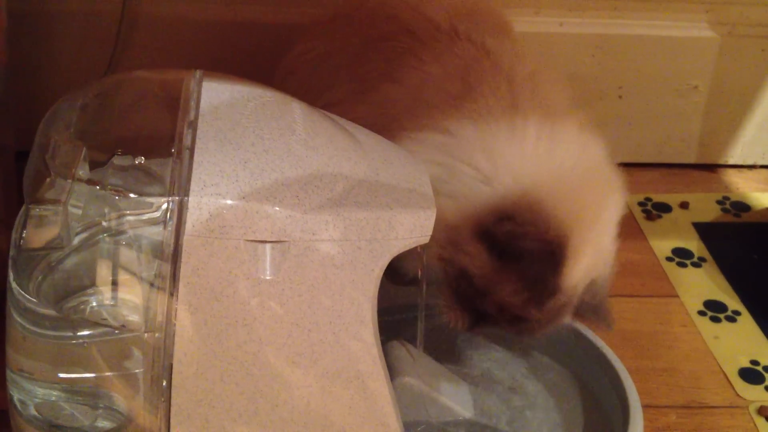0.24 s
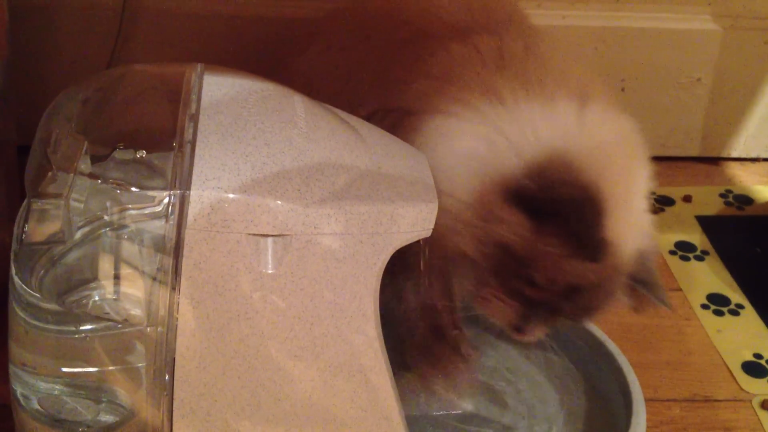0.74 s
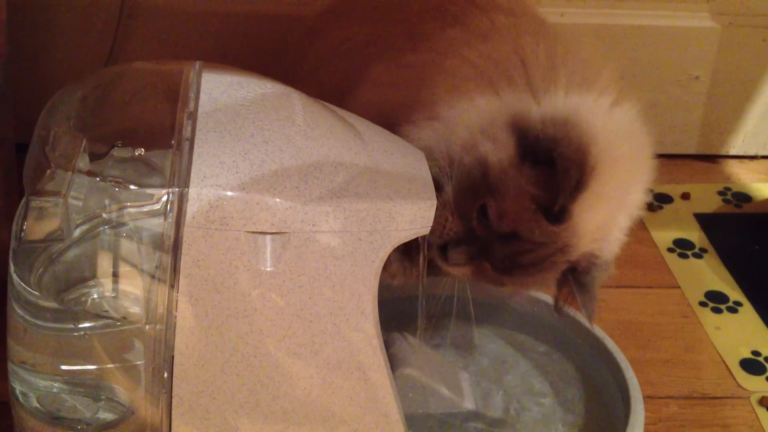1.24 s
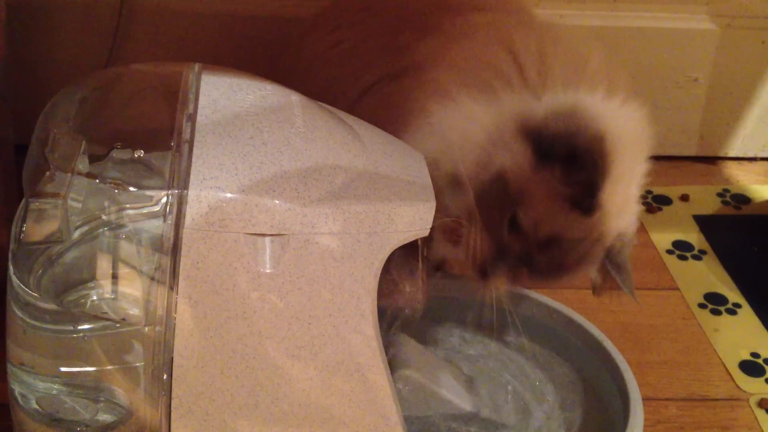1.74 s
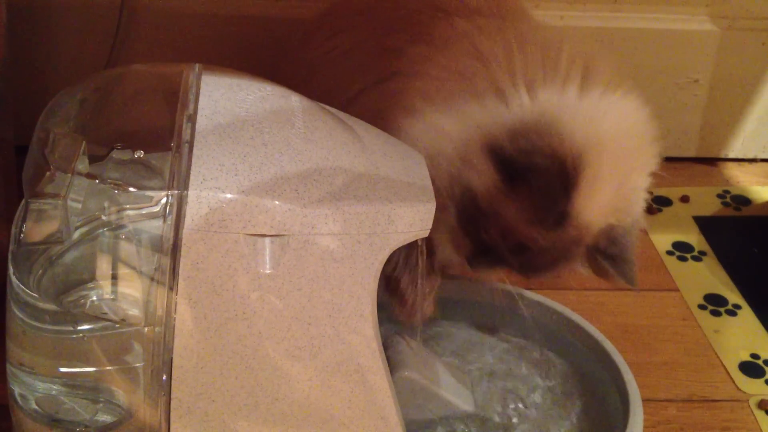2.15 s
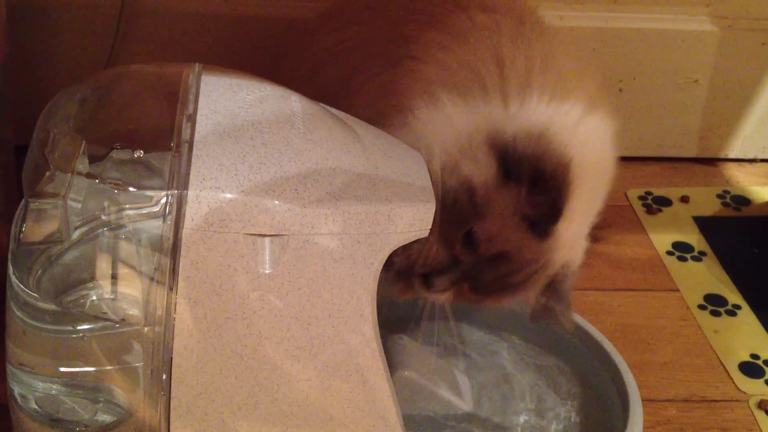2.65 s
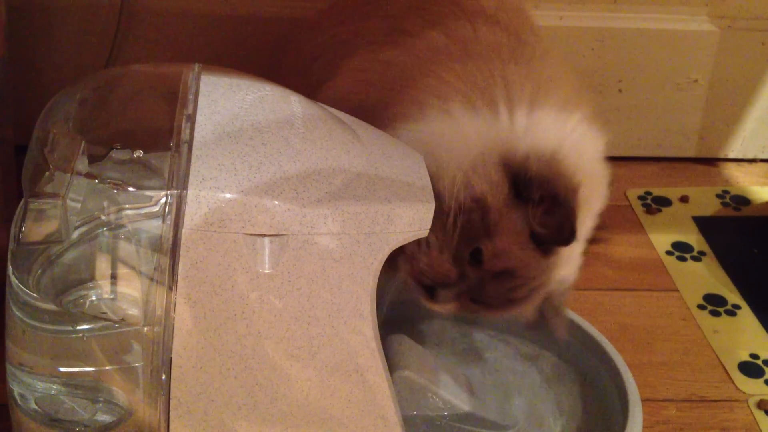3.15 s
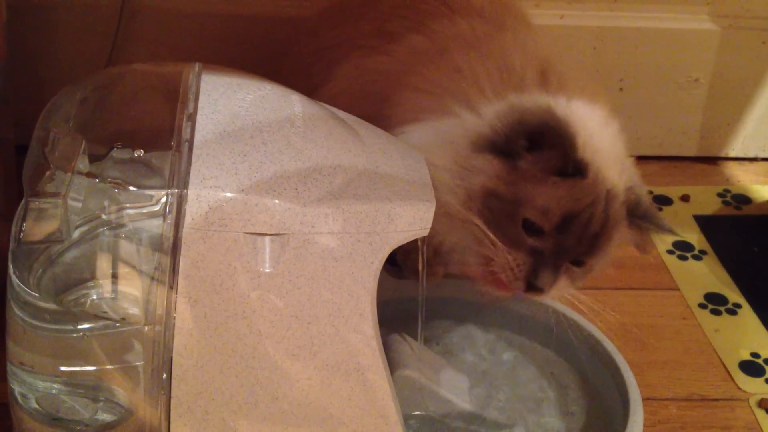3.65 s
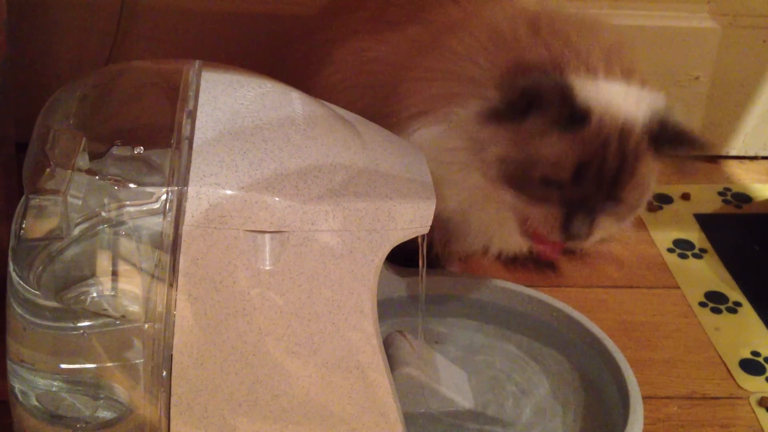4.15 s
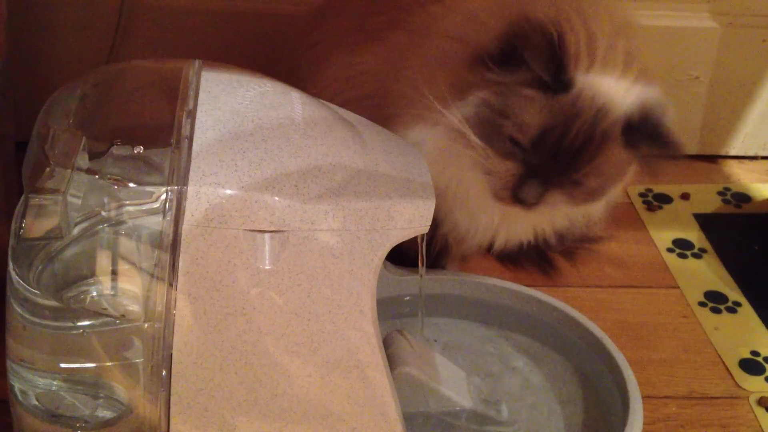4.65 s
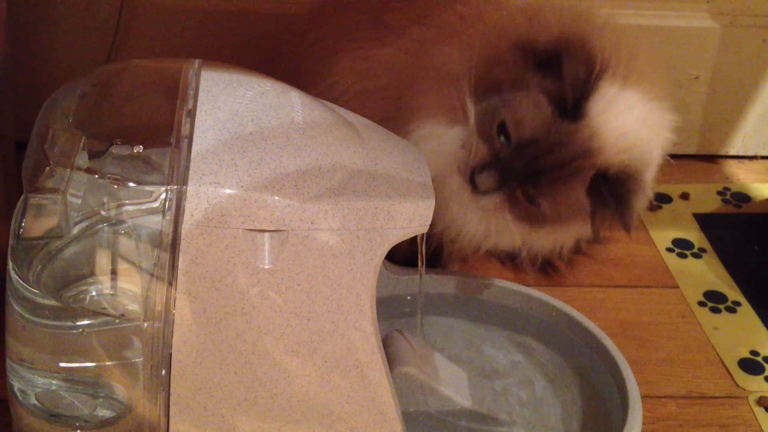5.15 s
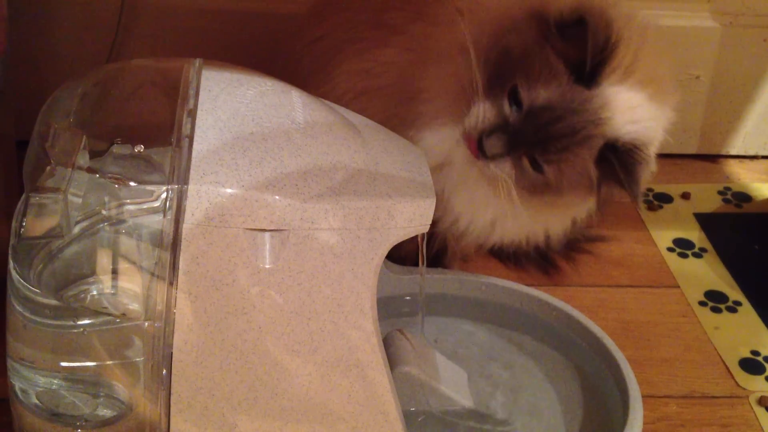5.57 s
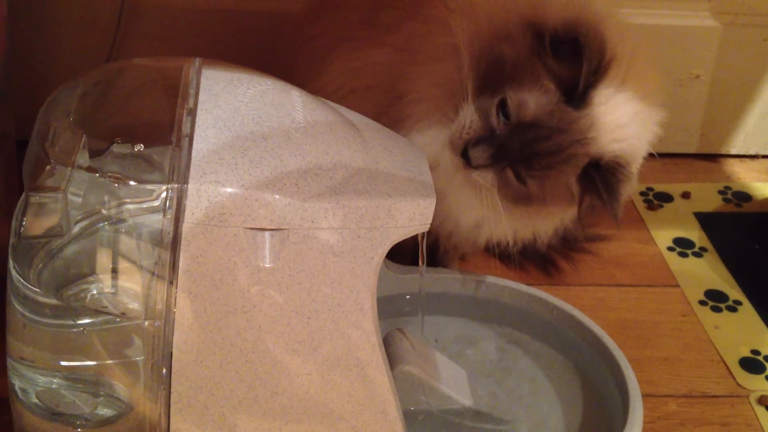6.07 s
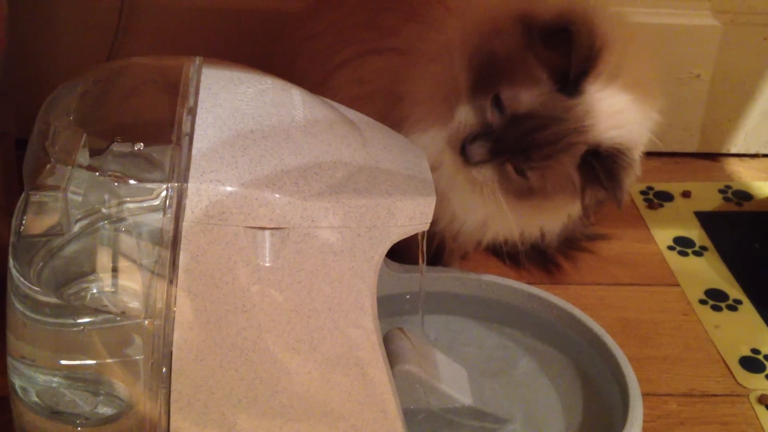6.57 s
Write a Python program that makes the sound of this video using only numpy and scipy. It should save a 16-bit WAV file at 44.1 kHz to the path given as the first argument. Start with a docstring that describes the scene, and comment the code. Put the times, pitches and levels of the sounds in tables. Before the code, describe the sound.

Small wet licks and drips over faint running water and a pump hum, with a short bubbling glug from a plastic tank midway.

```python
"""A plastic drinking fountain gulps air: bubbles ring its tank and thump the water column.
The gulps crowd together midway, where the surface churns and spits. Drops snap and trap
tiny ringing bubbles; a cat licks at the thin stream with small wet smacks.
Underneath, in a small room, the pump hums and the water runs with a soft rush and fizz."""
import sys
import numpy as np
from scipy import signal
from scipy.fft import rfft, irfft, next_fast_len
from scipy.io import wavfile
from scipy.ndimage import map_coordinates

SR = 44100
rng = np.random.default_rng(int(sys.argv[2]) if len(sys.argv) > 2 else 0)


def materialize(psi):
    """Save the field psi as 16-bit PCM at rate SR to the path in sys.argv[1].

    A 1-D psi becomes a single channel; in a 2-D psi each row is a channel.
    """
    bounded = np.clip(np.atleast_2d(psi).T, -1, 1)
    quanta = np.round(bounded * 32767).astype(np.int16)
    wavfile.write(sys.argv[1], SR, quanta)


N = 299880

# Water-filled tank: (frequency [Hz], width [Hz], gain [dB])
TANK_MODES = [(573, 21, -9), (685, 25, -5), (769, 99, -3.5), (799, 11, -4), (890, 37, -3.5),
              (1086, 41, -0.5), (1224, 49, 1.5), (1320, 47, -4.5), (1420, 81, 0.5), (1660, 34, -1)]
# Water column and base: (frequency [Hz], width [Hz], gain [dB])
COLUMN_MODES = [(240, 24, -2), (283, 19, -8), (371, 19, 2), (415, 38, 3.5), (494, 30, -2), (578, 20, 13)]
# Air entering the tank: (time [s], level [dB], pitch [Hz], thump gain [dB], trail's 20 dB fall [s])
GULPS = [(0.001, -44.5, 970, -12, .018), (1.089, -53, 836, -6, .012), (1.254, -45.5, 960, -15, .014),
         (1.903, -50, 1100, -3, .025), (2.5605, -42, 1000, -3, .018), (2.629, -44, 885, -10, 0.04),
         (2.840, -49.5, 860, 2.5, .012), (2.889, -30.5, 640, 1, .018), (2.920, -30, 790, -1.5, .06),
         (2.969, -28.5, 790, -8, .008), (2.978, -25, 1000, -6, .014), (3.014, -38.5, 740, -1, 0.1),
         (3.075, -33, 939, -8, .045), (3.117, -43, 1300, -17, .02), (3.1933, -22, 815, -9, .026),
         (3.212, -23.5, 900, -10, .055), (3.3444, -18, 870, -18, .016), (6.28, -55.5, 860, 0, .015)]
def gulps():
    """Each gulp thumps the water column; a small bubble, a big one and a fading trail ring the tank."""
    lead_s, lead_db, lead_ratio = .006, -7.5, 1.15
    trail_gap_s, trail_jitter_s, trail_ratio = .0086, .0014, 1.13
    out, t = np.zeros(N), np.arange(SR // 4) / SR
    push = bubble(t, hz=370, t60_s=.013, attack_s=.0015, rise=.03)
    thump = crest(filtered(push, lambda f: amp(-21) + resonances(COLUMN_MODES, f)))
    for start_s, db, hz, thump_db, fade_s in GULPS:
        bubbles = [(0, lead_db, hz * lead_ratio), (lead_s, 0, hz)]
        for k, (jitter, detune) in enumerate(rng.standard_normal((6, 2)), 1):
            age_s = abs(k * trail_gap_s + trail_jitter_s * jitter)
            trail_hz = hz * trail_ratio * np.exp(.16 * detune)
            bubbles.append((lead_s + age_s, -20 * age_s / fade_s, trail_hz))
        air = np.zeros(len(t))
        for delay_s, bubble_db, bubble_hz in bubbles:
            ring = bubble(t[:SR // 20], bubble_hz, t60_s=.016, attack_s=.002, rise=.035)
            add(air, delay_s, amp(bubble_db) * ring)
        slosh = 1 + .012 * rng.standard_normal()  # moving water detunes the tank
        tank = crest(filtered(air, lambda f: amp(-10) + resonances(TANK_MODES, f * slosh)))
        gulp = amp(db - 2.2) * (tank + amp(thump_db - 4.5) * thump)
        add(out, start_s, echoed(gulp, near_db=-8, near_t60_s=.04, room_db=-15))
    return out


# Spells of churning: (start [s], length [s], level [dB])
CHURN_SPELLS = [(2.943, 0.16, -56.5), (3.219, 0.041, -55), (3.356, 0.029, -63)]
def churn_db(t):
    """Surface churn level: each spell swells, holds and settles."""
    rise_db_per_s, fall_db_per_s = 500, 170
    spells_db = [db - rise_db_per_s * np.maximum(start_s - t, 0)
                 - fall_db_per_s * np.maximum(t - start_s - length_s, 0)
                 for start_s, length_s, db in CHURN_SPELLS]
    return np.max(spells_db, axis=0)


# Spray colour: (frequency [Hz], gain [dB])
SPRAY_SPECTRUM = [(900, -6), (1700, 4), (2600, -6.5), (3600, -5.5), (4800, -22), (7500, -18), (10000, -25),
                  (14000, -20)]
def spatter(bubbles_per_s):
    """The churned surface spits a spray of tiny bursts and ringing bubbles."""
    bursts_per_s, ring_cycles = 5000, 26
    bursts = rng.standard_normal(N) * (rng.random(N) < bursts_per_s / SR)
    spits = bursts * amp(3 * wobble(160))
    spray = unit(filtered(spits, lambda f: amp(along(SPRAY_SPECTRUM, f))))
    spray *= amp(churn_db(np.arange(N) / SR))
    rings, t = np.zeros(N), np.arange(SR // 50) / SR
    when, size, pitch = rng.random((bubbles_per_s * N // SR, 3)).T
    starts_s = when * N / SR
    for start_s, db, hz in zip(starts_s, churn_db(starts_s) + 1 + 7 * size, 2100 * 3.2 ** pitch):
        if db > -80:
            ring = bubble(t, hz, t60_s=ring_cycles / hz, attack_s=.0002, rise=.15)
            add(rings, start_s, amp(db) * ring)
    return spray + echoed(rings, near_db=-2, near_t60_s=.042, room_db=-14)


# Falling drops: (time [s], level [dB], pitch [Hz], ring t60 [s], snap gain [dB])
DROPS = [(1.109, -55, 2870, .008, -2), (1.259, -45.5, 4800, 0.0026, -12.5), (1.422, -56.5, 3200, .011, -8),
         (1.544, -54, 3200, 0.016, -3), (1.770, -53.5, 2630, .012, 2), (1.9054, -30.5, 2850, .018, -14),
         (2.064, -32, 5380, .01, -18), (2.15, -46.5, 7900, .01, 0), (2.482, -54, 2450, .014, -5),
         (2.601, -46, 6130, 0.0056, -1.5), (2.619, -48, 4170, 0.013, -4), (2.8399, -34.5, 2970, 0.0075, -8),
         (2.920, -36.5, 4430, 0.014, -3), (2.975, -39, 2150, 0.02, -7), (3.0153, -35.5, 2330, .012, -8),
         (3.039, -42, 3260, .016, -12), (3.05, -42.5, 4170, 0.0077, -7), (3.078, -44, 2370, .014, 2),
         (3.089, -45, 3440, .013, 1), (3.192, -46, 3060, .011, -2), (3.2268, -40, 6440, .006, -8),
         (3.264, -31.5, 3210, .009, -13), (3.345, -34.5, 2700, 0.0035, -11), (3.73, -49.5, 7830, .007, -4),
         (3.9005, -40.5, 2400, .008, -6), (5.097, -56, 3200, .019, -5), (6.539, -55, 3150, .013, -3)]
def drops():
    """A drop snaps and traps a ringing bubble; the smaller it is, the brighter the snap."""
    out, t = np.zeros(N), np.arange(SR // 4) / SR
    for start_s, db, hz, t60_s, snap_db in DROPS:
        ring = crest(bubble(t, hz, t60_s, attack_s=.0003, rise=.06))
        plink = ring + amp(snap_db) * snap(t, centre_hz=1.26 * hz)
        add(out, start_s, amp(db - .5) * echoed(plink, near_db=-2, near_t60_s=.043, room_db=-9))
    return out


# Tongue and water-film smacks: (time [s], level [dB], centre [Hz])
SMACKS = [(0.711, -52.5, 4940), (0.896, -55.5, 13500), (1.077, -57, 14500), (1.2595, -47, 4400),
          (1.9067, -38.5, 7200), (2.443, -53.5, 14000), (2.558, -47.5, 3600), (2.921, -35, 8000),
          (3.035, -38, 10500), (3.113, -46.5, 7600), (3.257, -37, 13400), (3.3457, -43.5, 7600),
          (4.749, -56, 8500), (4.960, -53.5, 4600), (5.638, -55, 6000), (5.762, -55, 7500),
          (6.1023, -43.5, 7100), (6.274, -55, 3400), (6.539, -51.5, 7000)]
def licks(faint_count):
    """The tongue and bursting water film smack, with fainter smacks scattered between."""
    out, t = np.zeros(N), np.arange(SR // 4) / SR
    faint = [(when * N / SR, -62 + 4 * size, 2800 * 5 ** pitch)
             for when, size, pitch in rng.random((faint_count, 3))]
    for start_s, db, hz in SMACKS + faint:
        add(out, start_s, amp(db) * echoed(snap(t, hz), near_db=-2.5, near_t60_s=.039, room_db=-8))
    return out


# Bursting film colour: (frequency [Hz], gain [dB])
SNAP_SPECTRUM = [(800, -3), (2500, 17), (5000, 2.5), (7500, 8.5), (10000, 0), (13500, 4.5), (16000, 8)]
def snap(t, centre_hz):
    """A wet film bursts in a broad band of noise."""
    t60_s, attack_s, half_width_oct = .016, .0002, .62
    band = lambda f: 1 / (1 + (np.log2((f + 1) / centre_hz) / half_width_oct) ** 2)
    noise = filtered(rng.standard_normal(len(t)), lambda f: amp(along(SNAP_SPECTRUM, f)) * band(f))
    return amp(-3.5) * unit(noise) * envelope(t, t60_s, attack_s)


# Weaker partials of the hum: (frequency [Hz], rms level [dB])
PUMP_PARTIALS = [(50, -91.5), (150, -80.5), (250, -79), (300, -81), (350, -82.5), (399, -74),
                 (598.5, -78.5), (699, -80)]
def pump():
    """The mains-driven pump hums steadily; its weaker partials waver with the water load."""
    hum_hz, hum_db = 99.8, -67
    t = np.arange(N) / SR
    hum = amp(hum_db) * np.sin(2 * np.pi * hum_hz * t)
    for hz, db in PUMP_PARTIALS:
        phase = 2 * np.pi * (hz * t + rng.random()) + .57 * wobble(4.8)
        hum += amp(db + wobble(5)) * np.sin(phase)
    return np.sqrt(2) * hum


# Running water and room air: (frequency [Hz], gain [dB])
FLOW_SPECTRUM = [(25, 1), (55, -8), (110, -14), (160, 1.5), (400, 1), (480, -0.5), (800, -3.5), (1700, -8),
                 (1950, -16), (3200, -11.5), (5000, -17), (7800, -17), (10000, -25.5), (13500, -18)]
# Hollow housing: (frequency [Hz], width [Hz], gain [dB])
HOUSING_MODES = [(400, 11, -15), (604, 28, -5.5), (873.3, 36, -1.5), (1053, 24, -5), (1199, 23, -9.5),
                 (1462, 98, -15.5), (1729, 12.5, -8.5)]
# Stream strength: (time [s], level [dB])
STREAM_LEVEL = [(0, 0.5), (2.2, 0.5), (3.6, 0), (5.3, -1), (6.3, 0), (6.8, -1)]
def flow():
    """Water slides down the ramp with a soft rush and stirs the hollow housing."""
    stream_db = np.interp(np.arange(N) / SR, *np.transpose(STREAM_LEVEL))
    rush = unit(filtered(rng.standard_normal(N), lambda f: amp(along(FLOW_SPECTRUM, f))))
    housing = unit(filtered(rng.standard_normal(N), lambda f: resonances(HOUSING_MODES, f)))
    flutter_db = .7 * wobble(14)
    return amp(-65.5 + .92 * stream_db) * rush + amp(-67 + .57 * stream_db + flutter_db) * housing


def trickle(bubble_count):
    """The stream fizzes with faint small bubbles where it meets the bowl."""
    out, t = np.zeros(N), np.arange(SR // 20) / SR
    starts_s = rng.random(bubble_count) * N / SR
    for start_s, (size, pitch) in zip(starts_s, rng.standard_normal((bubble_count, 2))):
        ring = bubble(t, hz=3300 * np.exp(.4 * pitch), t60_s=.0078, attack_s=.00037, rise=.08)
        stream_db = np.interp(start_s, *np.transpose(STREAM_LEVEL))
        add(out, start_s, amp(-61.5 + 2.3 * size + stream_db) * ring)
    return out


# Room decay: (frequency [Hz], t60 [s])
ROOM_T60 = [(200, 0.76), (900, 0.2), (3000, 0.22), (8000, 0.19), (15000, 0.044)]
def echoed(x, near_db, near_t60_s, room_db):
    """x with quick scatter from bowl, floor and door, then the room's tail."""
    t = np.arange(len(x)) / SR
    near = rng.standard_normal(len(x)) * amp(-60 * t / near_t60_s) * (t > .003)
    hz, frames_s, spectra = signal.stft(rng.standard_normal(len(x)), SR, nperseg=256)
    spectra *= amp(-60 * frames_s / along(ROOM_T60, hz)[:, None])
    tail = signal.istft(spectra, SR, nperseg=256)[1][:len(x)] * (t > .008)
    response = amp(near_db) * near / np.linalg.norm(near) + amp(room_db) * tail / np.linalg.norm(tail)
    return x + signal.fftconvolve(x, response)[:len(x)]


def bubble(t, hz, t60_s, attack_s, rise):
    """An air pocket rings briefly, its pitch climbing as it nears the surface."""
    glide_hz = hz * (1 + rise * (np.minimum(t / t60_s, 1) - .2))
    return np.sin(2 * np.pi * np.cumsum(glide_hz) / SR) * envelope(t, t60_s, attack_s)


def envelope(t, t60_s, attack_s):
    """Exponential attack and decay."""
    return amp(-60 * t / t60_s) * (1 - np.exp(-t / attack_s))


def resonances(modes, f):
    """Causal response of summed modes at f Hz."""
    return sum(amp(db) * 1j * f * width_hz / (hz * hz - f * f + 1j * f * width_hz)
               for hz, width_hz, db in modes)


def filtered(x, response):
    """x through a complex frequency response."""
    size = next_fast_len(len(x) + SR // 10)
    return irfft(rfft(x, size) * response(np.fft.rfftfreq(size, 1 / SR)), size)[:len(x)]


def wobble(knots_per_s):
    """Smooth random curve."""
    knots = rng.standard_normal(int(N * knots_per_s / SR) + 4)
    coarse = np.arange(0, N, 100)
    curve = map_coordinates(knots, [coarse * knots_per_s / SR])
    return np.interp(np.arange(N), coarse, curve)


def along(points, hz):
    """Interpolate points over log frequency."""
    points_hz, values = np.transpose(points)
    return np.interp(np.log(hz + 1), np.log(points_hz), values)


def add(track, start_s, sound):
    """Mix a sound into the track."""
    part = track[round(start_s * SR):][:len(sound)]
    part += sound[:len(part)]


def amp(db):
    """Decibels to gain."""
    return 10 ** (np.asarray(db) / 20)


def unit(x):
    """Scale to rms 1."""
    return x / np.sqrt(np.mean(x ** 2) + 1e-20)


def crest(x):
    """Scale to peak 1."""
    return x / np.abs(x).max()


def scene():
    """All sources, close and in mono."""
    events = gulps() + spatter(bubbles_per_s=260) + drops() + licks(faint_count=12)
    background = pump() + flow() + trickle(bubble_count=350)
    return (events + background)[None]


def record(dry):
    """The small microphone sheds deep bass; the top treble is cut off."""
    low_cut_hz, top_hz = 55, 15450
    low_cut = signal.butter(4, low_cut_hz, "highpass", fs=SR, output="sos")
    return filtered(signal.sosfilt(low_cut, dry[0]), lambda hz: hz < top_hz)[None]


dry = scene()
out = record(dry)
materialize(out)
```